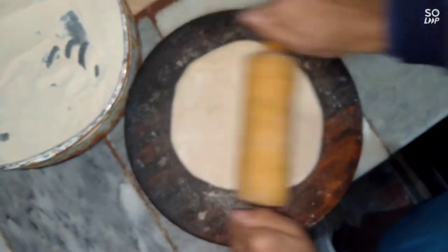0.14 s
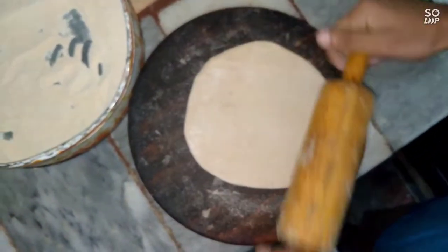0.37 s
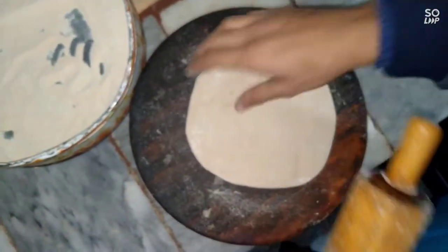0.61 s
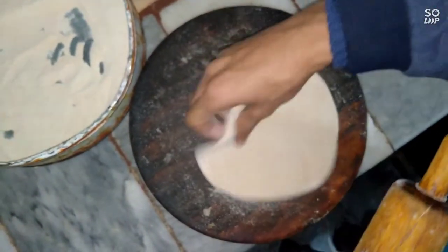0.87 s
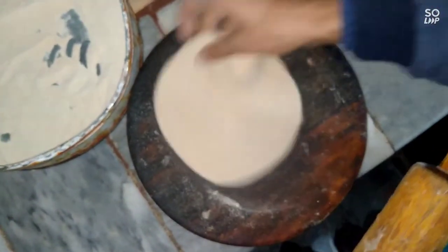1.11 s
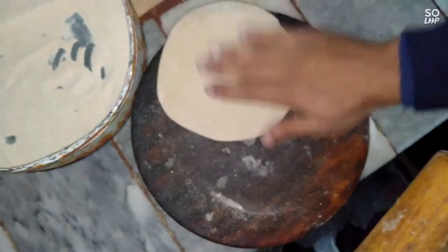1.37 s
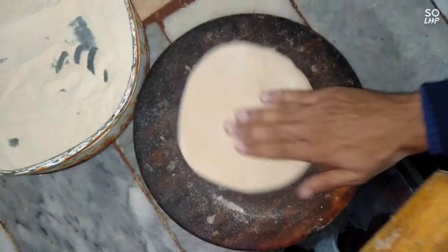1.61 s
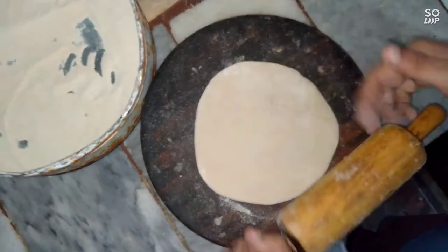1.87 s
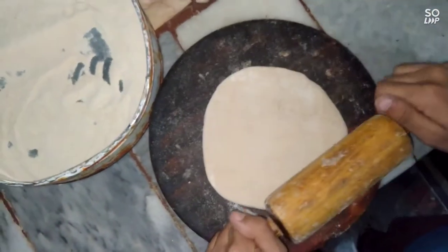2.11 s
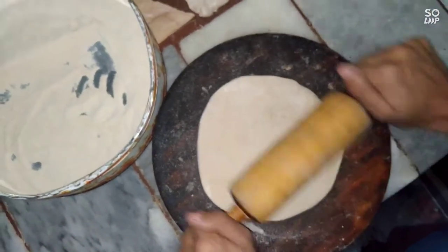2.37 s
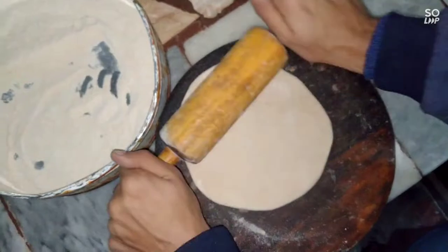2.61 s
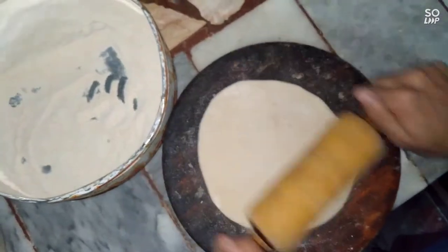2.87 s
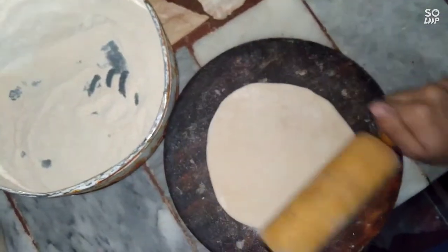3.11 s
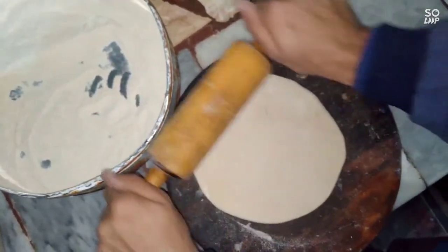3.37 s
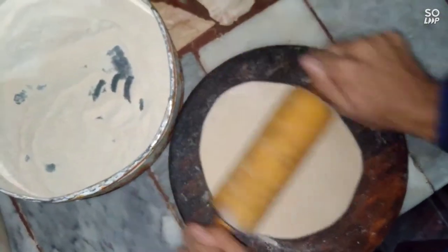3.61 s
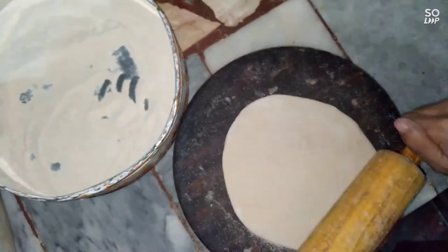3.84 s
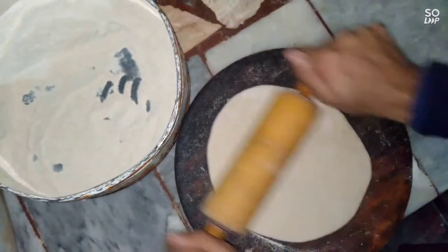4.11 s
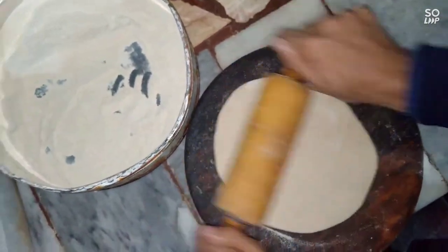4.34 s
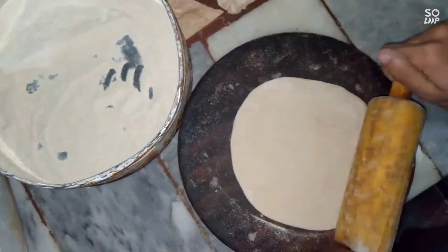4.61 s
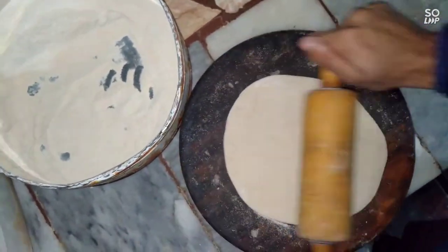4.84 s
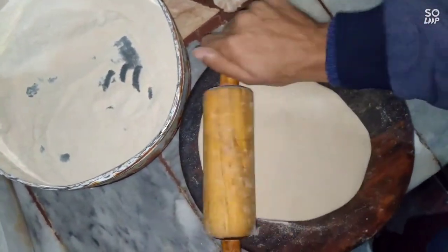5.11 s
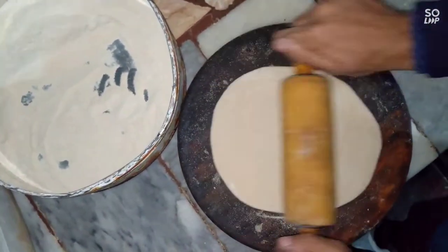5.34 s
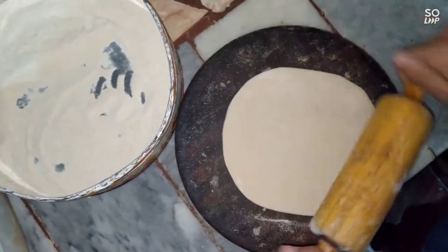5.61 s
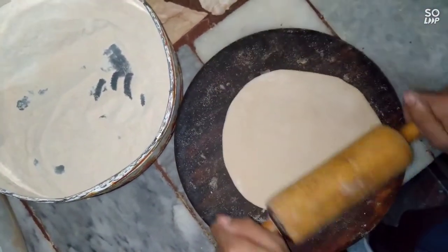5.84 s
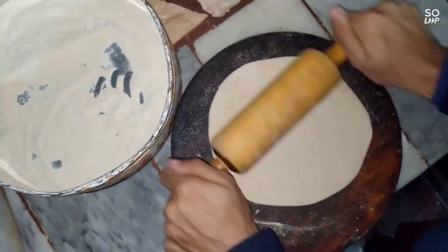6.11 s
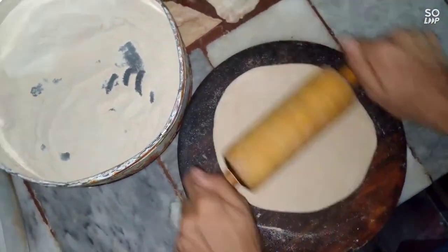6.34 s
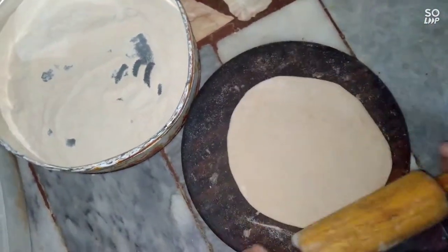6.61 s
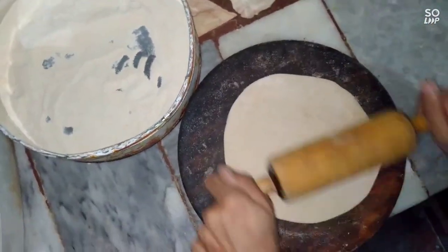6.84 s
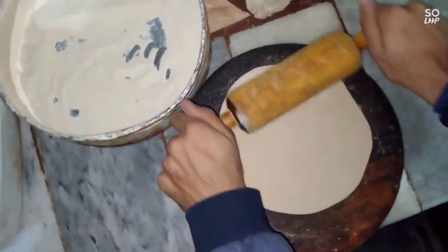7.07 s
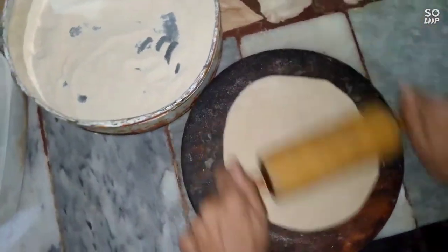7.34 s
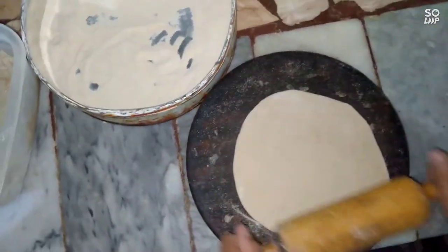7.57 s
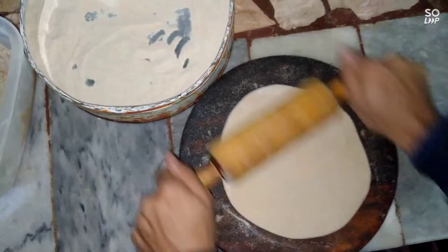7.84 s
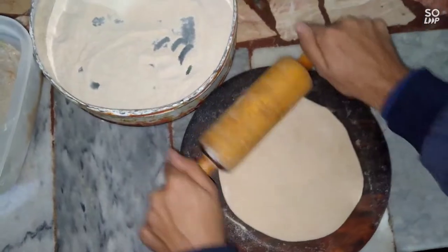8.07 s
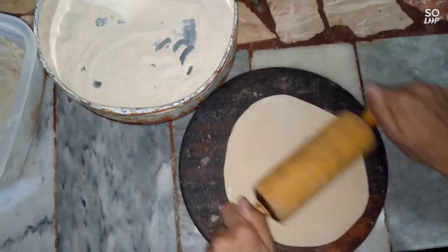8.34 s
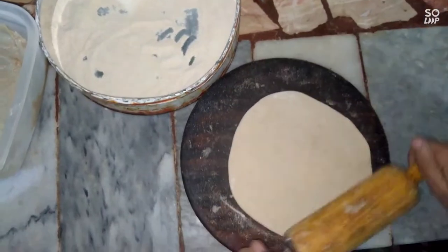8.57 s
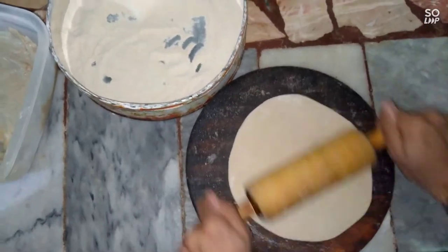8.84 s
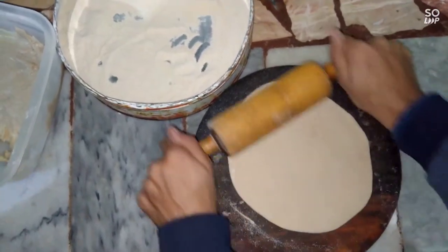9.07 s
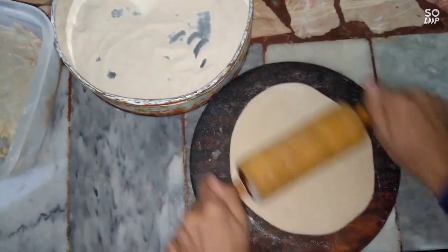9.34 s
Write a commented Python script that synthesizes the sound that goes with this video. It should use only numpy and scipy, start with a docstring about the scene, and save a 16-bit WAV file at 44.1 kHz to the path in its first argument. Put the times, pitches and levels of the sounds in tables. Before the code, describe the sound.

Floury rubbing and light scrapes over dough, broken by several loud ringing wood clacks early on, then quieter rolling with dull low pops.

```python
"""A wooden pin rolls dough on a round board in a small hard room, over steady noise, faint hum and low rumble.
First come hissing strokes over dough and flour, soft thuds in the room's low modes and short scrapes;
from 2.2 to 4.5 s the pin clacks loudly, ringing board, floor and room, dulled above about 3 kHz by the
microphone. Strokes and thuds go on, with scrapes near 6 s; after 6.4 s come most of the dull pops nearby
and, at 7.4 and 8.3 s, two weak clacks. Hiss is shaped noise; board and room modes are decaying sines."""
import sys
import numpy as np
from scipy import signal
from scipy.fft import rfft, irfft
from scipy.io import wavfile

SR = 44100
rng = np.random.default_rng(int(sys.argv[2]) if len(sys.argv) > 2 else 0)


def transcribe(signal):
    """Save signal, clipped to [-1, 1], as a 16-bit WAV file at the path in sys.argv[1]."""
    frames = np.atleast_2d(signal).T
    limited = np.clip(frames, -1, 1)
    pcm = np.round(limited * 32767).astype(np.int16)
    wavfile.write(sys.argv[1], SR, pcm)


def to_linear_factor(level_db):
    """Convert decibel levels (scalar or array-like) to linear amplitude factors."""
    exponent = np.asarray(level_db, float) / 20
    return 10 ** exponent


N = 416744
FLOOR_CUT_HZ = 88   # low cut of the rumble, and of clacks, thuds and pops


def rms_one(x):
    """Scale to unit power."""
    return x / np.sqrt(np.mean(x ** 2) + 1e-20)


def at_hz(points, hz, axis=1):
    """Read a table column on a log-frequency axis."""
    points = np.array(points)
    return np.interp(np.log(hz), np.log(points[:, 0]), points[:, axis])


def butter(x, hz, kind, order=2):
    """Butterworth filter."""
    return signal.sosfilt(signal.butter(order, hz, kind, fs=SR, output="sos"), x)


def drift(rate_hz):
    """Random wavering of rms 1: noise through two equal poles, computed on every 40th sample."""
    r = np.exp(-2 * np.pi * rate_hz * 40 / SR)
    noise = rng.standard_normal(N // 40 + 2002)
    slow = signal.lfilter([1], [1, -2 * r, r * r], noise)[2000:]   # skip the filter's start
    return np.interp(np.arange(N) / 40, np.arange(len(slow)), rms_one(slow))


def ring(drive, hz, t60):
    """A resonance: a unit click sets a decaying sine of height 1 ringing."""
    r, w = to_linear_factor(-60 / (t60 * SR)), 2 * np.pi * hz / SR
    return signal.lfilter([0, np.sin(w)], [1, -2 * r * np.cos(w), r * r], drive + 1e-18)


def coloured(spectrum, size=N):
    """Noise of a given spectrum, rms 1."""
    hz = np.maximum(np.arange(size // 2 + 1) * SR / size, 1)
    return rms_one(irfft(rfft(rng.standard_normal(size)) * to_linear_factor(at_hz(spectrum, hz)), size))


def add(out, s, sound):
    """Mix a sound in at a time in seconds."""
    i = round(s * SR)
    out[i:i + len(sound)] += sound[:N - i]


def push(seconds):
    """A smooth force pulse of unit area."""
    shape = np.hanning(int(seconds * SR) + 3)
    return shape / shape.sum()


# Spectrum of the background noise. Each row: frequency in Hz, relative level in dB per Hz.
NOISE_SPECTRUM = [(20, -72.5), (60, -60), (85, -11), (108, 2), (167, -5), (299, -2), (460, -9.5),
                  (750, -17.5), (1000, -20.5), (2100, -24.5), (3300, -29), (4200, -35), (6000, -37),
                  (8000, -39.5), (12000, -34.5), (15400, -29), (15600, -82)]
# Low tones where the room resonates. Each row: frequency in Hz, width in Hz, level in dB.
HUM_TONES = [(100.6, 1.4, -74.5), (175, 4, -73.5), (250, 12, -81.5), (280.3, 29, -73), (476.2, 140, -83.5)]


def hum():
    """Steady background: broad noise, and narrow resonances stirred by noise into wavering tones."""
    out = to_linear_factor(-67 + 0.69 * drift(1.9)) * coloured(NOISE_SPECTRUM)
    for hz, width_hz, db in HUM_TONES:
        t60 = np.log(1000) / np.pi / width_hz   # a narrower resonance rings longer
        out += to_linear_factor(db) * rms_one(ring(rng.standard_normal(N), hz, t60))
    return out


# Low standing waves of the room. Each row: frequency in Hz, level in dB, t60 in seconds.
ROOM_MODES = [(105.5, 0, .5), (130, -2, .4), (183, -18, .5), (225, -11, .3), (294, -8, .35)]
# Course of the low rumble. Each row: time in seconds, level in dB, before a slight wavering and the low cut.
RUMBLE_COURSE = [(0, -57), (.3, -73), (1.1, -65.5), (1.6, -83.5), (2.2, -61), (2.56, -42), (2.72, -68),
                 (3.3, -50), (3.45, -62), (4.1, -58.5), (4.5, -68), (4.9, -60), (5.3, -68.5), (5.62, -60),
                 (5.9, -78), (6.5, -68), (7.3, -63), (7.85, -68.5), (8.0, -56), (8.7, -62.5), (8.95, -60),
                 (9.1, -67), (9.45, -64.5)]


def rumble():
    """Noise stirs the two lowest room modes, both with a t60 of 0.52 s, along a slow course of levels."""
    level_db = np.interp(np.arange(N) / SR, *np.transpose(RUMBLE_COURSE)) + drift(5.2)
    modes = sum(to_linear_factor(db) * rms_one(ring(rng.standard_normal(N), hz, 0.52)) for hz, db, _ in ROOM_MODES[:2])
    return to_linear_factor(level_db) * butter(rms_one(modes), FLOOR_CUT_HZ, "high", order=4)


# Hand and pin over dough and flour. Each row: time of full speed in seconds, rise in seconds,
# fall in seconds, hiss there in dB, body of the rub there in dB, both before the flicker.
STROKES = [(0.0, .1, 0.2, -65.5, -70), (0.36, 0.11, 0.25, -64, -68.5), (0.921, 0.071, 0.036, -64.5, -69),
           (0.97, .012, 0.012, -62.5, -74), (1.08, 0.087, .12, -63.5, -62), (1.42, 0.18, 0.12, -59, -60.5),
           (1.66, 0.014, 0.047, -69, -60.5), (1.791, 0.13, .2, -60, -65), (2.14, 0.16, 0.082, -82, -78),
           (2.72, 0.26, 0.18, -63, -67.5), (2.934, 0.032, 0.056, -70.5, -64), (3.5, 0.31, 0.27, -68.5, -71),
           (4.34, 0.17, 0.16, -65.5, -66.5), (4.915, 0.042, 0.12, -72.5, -70.5),
           (5.211, 0.28, 0.17, -67, -69.5), (5.58, 0.11, 0.23, -65, -66), (6.29, 0.21, 0.23, -68, -67.5),
           (6.701, .15, 0.15, -67.5, -68.5), (7.2, 0.26, 0.22, -69.5, -74), (7.63, 0.23, .16, -68.5, -70),
           (7.91, 0.014, 0.053, -76, -74), (8.1, 0.25, 0.13, -69.5, -71), (8.5, 0.47, 0.46, -74.5, -74.5),
           (9.15, 0.38, 0.28, -73, -78)]
# Spectrum of the hiss. Each row: frequency in Hz, relative level in dB per Hz.
HISS_SPECTRUM = [(300, -62.5), (500, -28.5), (1000, -9.5), (1400, -3.5), (1800, -3.5), (2000, 0),
                 (2250, -4), (2700, -6.5), (3100, -11.5), (3600, -26.5), (4600, -31), (7500, -43.5),
                 (10000, -83.5)]
# Spectrum of the body of the rub. Each row: frequency in Hz, relative level in dB per Hz.
BODY_SPECTRUM = [(150, -42.5), (250, -10), (400, -2), (800, 4.5), (1200, -4.5), (1800, -27), (3000, -81)]


def rubbing():
    """Each stroke swells and fades with the speed of the hand; flour grains hiss with a slight flicker."""
    ends_db, roundness = -16.5, 1.3   # level at the ends of rise and fall; 1 = pointed, 2 = round
    t, hiss, body = np.arange(N) / SR, np.zeros(N), np.zeros(N)   # hiss and body hold powers
    for s, rise_s, fall_s, hiss_db, body_db in STROKES:
        near = slice(max(round((s - 3 * rise_s) * SR), 0), round((s + 3 * fall_s) * SR))
        away = np.where(t[near] < s, (s - t[near]) / rise_s, (t[near] - s) / fall_s)
        power = to_linear_factor(ends_db * away ** roundness) ** 2
        hiss[near] += power * to_linear_factor(hiss_db) ** 2
        body[near] += power * to_linear_factor(body_db) ** 2
    flicker = to_linear_factor(1.8 * drift(60))
    return flicker * (np.sqrt(hiss) * coloured(HISS_SPECTRUM) + np.sqrt(body) * coloured(BODY_SPECTRUM))


# Skin or wood drags and catches, starting and stopping abruptly. Each row: start in seconds,
# length in seconds, level in dB, centre in Hz, reach either side in octaves.
DRAGS = [(1.025, 0.082, -58, 1400, .55), (1.381, .097, -55, 1530, .6), (1.71, 0.16, -61, 2180, .55),
         (5.578, .09, -68, 1400, 0.11), (6.241, 0.1, -69, 815, 0.11)]


def drags():
    """A coarse scrape: noise in one band, held between short edges."""
    out, edge_s, t = np.zeros(N), 0.01, np.arange(SR // 4) / SR
    for s, length_s, db, hz, octaves in DRAGS:
        band_hz = [hz / 2 ** octaves, hz * 2 ** octaves]
        band = butter(rng.standard_normal(len(t)), band_hz, "band", order=5)
        held = np.clip(np.minimum(t, length_s + edge_s - t) / edge_s, 0, 1)
        add(out, s, to_linear_factor(db) * rms_one(band) * held)
    return out


# Short dull pops nearby. Each row: start in seconds, level in dB before a common lift of 8 dB,
# pitch in Hz that the fall settles to.
POPS = [(2.045, -49, 151), (6.451, -40.5, 150), (6.774, -42.5, 168), (7.046, -45, 169.6), (8.221, -39, 154),
        (8.265, -38.5, 141), (8.608, -38.5, 140.4), (8.829, -38.5, 141.2)]


def pops():
    """A cycle or two at low pitch, falling as it dies."""
    out, t = np.zeros(N), np.arange(SR // 10) / SR
    for s, db, hz in POPS:
        phase = 2 * np.pi * hz * (t + 0.0017 * (1 - np.exp(-t / 0.0079)))
        envelope = (1 - np.exp(-t / 0.0015)) * np.exp(-t / 0.0047)
        add(out, s, -to_linear_factor(db + 8.0) * np.sin(phase) * envelope)
    return out


# Soft pushes through board and floor. Each row: time in seconds (the swell starts 9 ms before),
# level in dB before a common lift of 2.5 dB, share of the upper mode from 0 to 1, free ringing in seconds.
THUDS = [(0.018, -38.5, 0.16, 0.11), (0.541, -54, 0.37, 0.069), (0.863, -44, 0.22, 0.071),
         (1.668, -37.5, 0.3, 0.1), (1.85, -53, 0.35, 0.048), (2.248, -14.5, 0.42, 0.11),
         (2.966, -14.5, 0.5, 0.13), (3.339, -45.5, 0.03, 0.066), (3.775, -22.5, 0.68, 0.14),
         (4.033, -53, 0.13, 0.11), (4.158, -52, 0.32, 0.053), (4.547, -25, 0.27, 0.053),
         (4.925, -29.5, 0.18, 0.082), (5.192, -47.5, 0.5, 0.089), (5.629, -47.5, 0.45, 0.13),
         (6.061, -53.5, 0.2, 0.068), (6.985, -39.5, 0.27, 0.081), (7.44, -36, 0.17, 0.051),
         (7.916, -30, 0.31, 0.07), (8.107, -51, 0.27, 0.11), (8.341, -41.5, 0.23, 0.063)]


def thuds():
    """Pushes swell the lowest two standing waves, damped once the load shifts."""
    out, t = np.zeros(N), np.arange(SR // 2) / SR
    (low_hz, _, low_t60), (up_hz, _, up_t60) = ROOM_MODES[:2]
    low = np.sin(2 * np.pi * low_hz * t) * to_linear_factor(-60 * t / low_t60)
    up = np.sin(2 * np.pi * up_hz * t) * to_linear_factor(-60 * t / up_t60)
    swell = (1 - np.exp(-t / 0.0041)) ** 2
    for s, db, upper, free_s in THUDS:
        pair = (1 - upper) * low + upper * up
        damped = to_linear_factor(-14.0 * np.clip((t - free_s) / 0.063, 0, 1))
        add(out, max(s - .009, 0), to_linear_factor(db + 2.5) * pair * swell * damped)
    return out


def booms(floor):
    """Blows pushed into the floor ring the upper standing waves of the room."""
    return sum(to_linear_factor(db) * ring(floor, hz, t60) for hz, db, t60 in ROOM_MODES[2:])


# Diffuse tail of the room. Each row: frequency in Hz, t60 in seconds, relative level in dB.
REVERB = [(150, 0.64, -2), (298, 0.54, 3.5), (450, 0.41, -1), (626, 0.3, 0.5), (842.2, 0.46, -3),
          (1130, 0.36, -4.5), (1400, 0.42, -2), (1800, .34, -5), (2500, .36, -4), (3500, 0.36, -5.5)]
# Reflections from floor and walls. Each row: lag in seconds, level in dB.
ECHOES = [(.0021, -5.5), (.0095, -7.5), (0.017, -10.5), (0.0225, -13)]


def room(x):
    """A few strong echoes, and a diffuse tail that builds up and dies band by band."""
    t, edges = np.arange(SR) / SR, 140 * 2 ** np.arange(0, 5.6, .25)   # quarter octaves, Hz
    tail = np.zeros(SR)
    for low, high in zip(edges, edges[1:]):
        hz = np.sqrt(low * high)
        band = butter(rng.standard_normal(SR), [low, high], "band")
        tail += band * to_linear_factor(at_hz(REVERB, hz, axis=2) - 60 * t / at_hz(REVERB, hz))
    tail *= 1 - np.exp(-t / 0.001)
    tail *= to_linear_factor(-8.5) / np.sqrt(np.sum(tail ** 2))   # energy of the whole tail, dB
    for lag, db in ECHOES:
        tail[round(lag * SR)] += to_linear_factor(db)
    return signal.fftconvolve(x, tail)[:N]


def dull(x):
    """Loud peaks are rounded, then the microphone rolls off steeply."""
    overload, cut_hz = 0.81, 2830
    return butter(overload * np.tanh(x / overload), cut_hz, "low", order=6)


# Pin on board. Each row: start in seconds, peak in dB before room and microphone, lowest and highest Hz
# of the contact, push into the floor in dB, treble spray in dB before its filters,
# level sent to the room in dB relative to the peak.
CLACKS = [(2.004, -50.5, 250, 794, -70, -89, -12), (2.04, -61.5, 1191, 2200, -79.5, -102, -9.5),
          (2.077, -62.5, 1230, 1990, -81, -98.5, -4), (2.138, -60.5, 700, 1500, -77.5, -95.5, -9),
          (2.181, -59.5, 1800, 2500, -84.5, -99, -10.5), (2.2391, -5.5, 705, 1262, -12.5, -67, -1),
          (2.959, 1, 382, 2580, -22, -62, -2), (3.663, -27.5, 900, 3500, -71, -76, 0),
          (3.670, -14, 900, 6450, -41.5, -45, -1), (3.767, -7, 405, 2220, -19.5, -66, -2),
          (4.531, -13.5, 400, 1660, -26, -73, -4), (7.428, -27, 450, 989, -35, -87.5, -5),
          (8.31, -32.5, 450, 720, -40, -90, -5.5)]
# Modes of board and pin. Each row: frequency in Hz, relative level in dB before a random spread, t60 in seconds.
BOARD_MODES = [(295, -5, 0.033), (422.4, -6, 0.025), (610, -0.5, 0.02), (755, -2.5, 0.022), (900, 1, 0.013),
               (1240, -1.5, .009), (1500, 0.5, 0.01), (1940, -5, 0.013), (2150, -1.5, .008),
               (2650, -3, 0.0067), (3137, -8, 0.012)]


def clacks():
    """Each blow is a quick clatter of contacts into the board's modes; its contact band sets how dull it is."""
    (out, sent, floor, spray), t = np.zeros((4, N)), np.arange(SR // 8) / SR
    spread_db = rng.normal(0, 0.91, (len(CLACKS), len(BOARD_MODES)))
    signs = (-1) ** np.arange(len(BOARD_MODES))   # neighbours alternate, so no hollows lie between them
    for (s, db, low_hz, high_hz, push_db, spray_db, tail_db), own_db in zip(CLACKS, spread_db):
        touch = .02 * rng.standard_normal(len(t)) * np.exp(-t / .004)   # rough wood clatters a little
        touch[[0, round(.0032 * SR)]] += [-1, .2]   # hit and bounce
        touch = butter(butter(touch, high_hz, "low", order=3), low_hz, "high")
        knock = np.zeros(len(t))
        for (hz, mode_db, t60), extra_db, sign in zip(BOARD_MODES, own_db, signs):
            knock += sign * to_linear_factor(mode_db + extra_db) * ring(touch, hz, t60)
        knock /= np.abs(knock).max()
        add(out, s, to_linear_factor(db) * knock)
        add(sent, s, to_linear_factor(db + tail_db) * knock)
        add(floor, s, to_linear_factor(push_db) * push(0.0024))
        fading = np.exp(-t / 0.011) + 0.12 * np.exp(-t / .03)
        add(spray, s, to_linear_factor(spray_db) * rng.standard_normal(len(t)) * fading)
    return out, sent, floor, butter(butter(spray, [3600, 6000], "band"), 3000, "high")


def scene():
    """Everything at the microphone; its dullness acts on the clacks and their room sound."""
    knocks, sent, floor, spray = clacks()
    low = booms(floor) + thuds() + pops()
    struck = butter(dull(knocks + room(sent)) + low, FLOOR_CUT_HZ, "high", order=6)
    return (struck + spray + rubbing() + rumble() + drags() + hum())[None]


def low_pass(x):
    """Removes everything above the highest recorded frequency."""
    return signal.sosfilt(signal.butter(12, 15500, fs=SR, output="sos"), x)


def record(dry):
    """The finished mix is taken down as it stands at the microphone."""
    return low_pass(dry)


dry = scene()
out = record(dry)
transcribe(out)
```